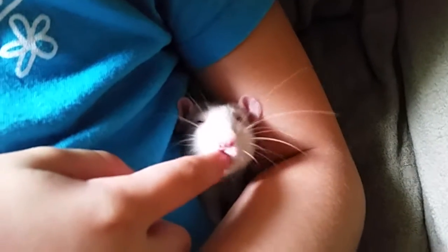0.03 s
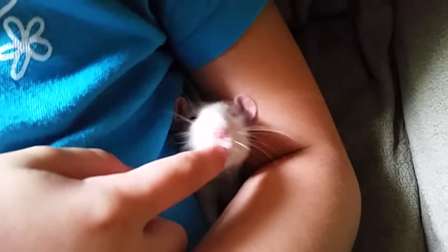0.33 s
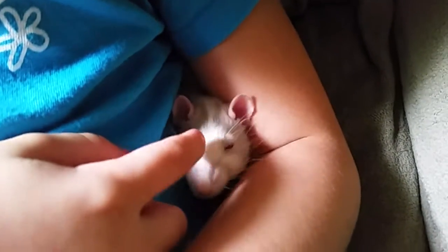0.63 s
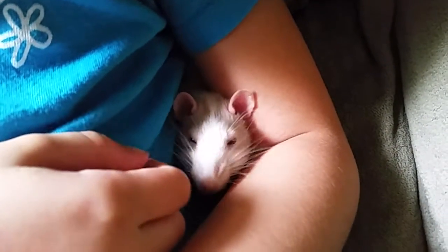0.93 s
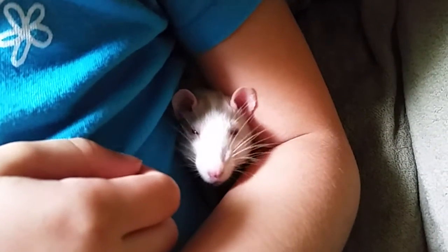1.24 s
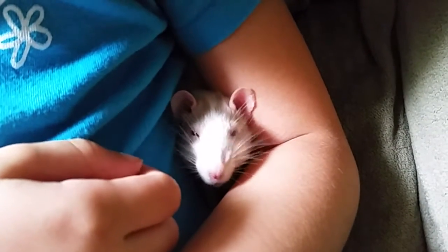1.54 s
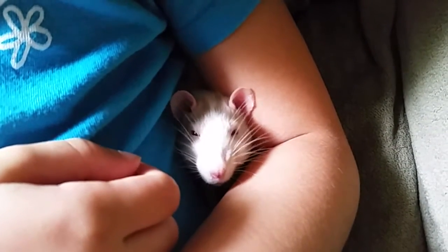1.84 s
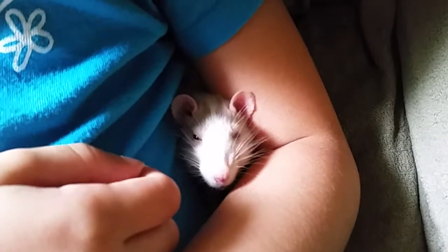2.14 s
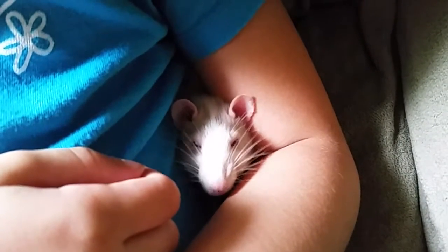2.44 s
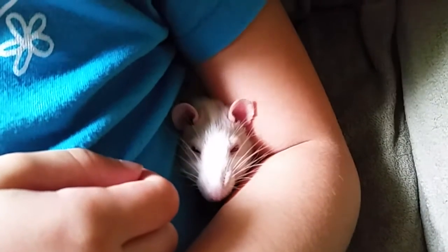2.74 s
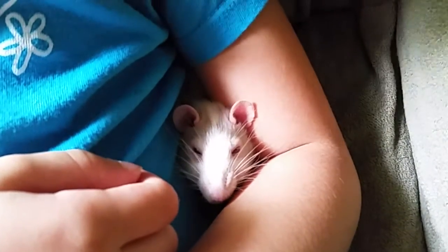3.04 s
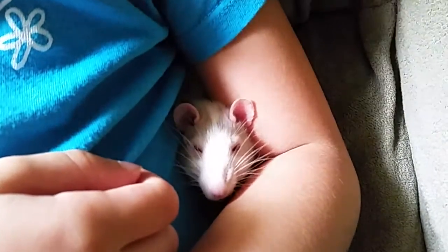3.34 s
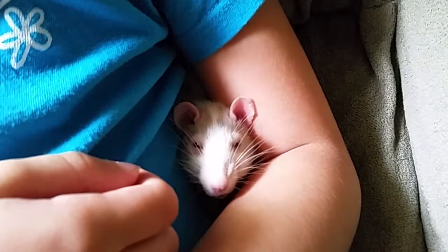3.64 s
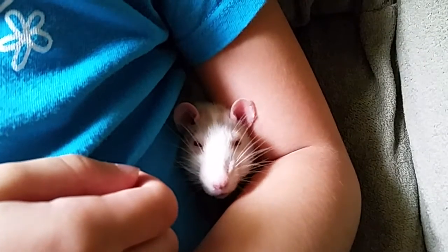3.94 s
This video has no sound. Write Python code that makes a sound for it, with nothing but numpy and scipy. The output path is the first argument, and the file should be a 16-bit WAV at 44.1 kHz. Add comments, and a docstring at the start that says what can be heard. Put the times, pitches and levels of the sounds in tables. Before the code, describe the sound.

A pet rat grinds its teeth in soft, quick clicks close to the microphone, stops, then makes a few thin, high scrapes. Fur and cloth rustle faintly with soft bumps, over a quiet room's steady low hum and hiss.

```python
"""Soft, quick tooth grinding, close to the microphones: a pet rat held in the crook of an arm.
About seven strokes a second, every second one stronger, each a few tiny slips of the incisors
that knock in the skull. Its mouth pops softly; fur and cloth rustle as the arm shifts.
Further off a quiet room rumbles and hums, and two unlike microphones hiss, left and right."""
import sys
import numpy as np
from scipy import signal
from scipy.fft import rfft, irfft, next_fast_len
from scipy.io import wavfile
from scipy.ndimage import map_coordinates

SR = 44100
rng = np.random.default_rng(int(sys.argv[2]) if len(sys.argv) > 2 else 0)


def digitize_waveform(pressure):
    """Quantize a signal to 16-bit integers and store it at the path in sys.argv[1].

    Rows of a 2-D input are taken as channels; values are limited to [-1, 1].
    """
    field = np.atleast_2d(pressure).T
    bounded = np.clip(field, -1, 1)
    quanta = np.round(bounded * 32767).astype(np.int16)
    wavfile.write(sys.argv[1], SR, quanta)


N = 176400


def amp(db):
    """Decibels to gain."""
    return 10 ** (np.asarray(db) / 20)


def unit(x):
    """Scale to rms 1."""
    return x / np.sqrt(np.mean(x ** 2) + 1e-20)


def gains(points, hz):
    """Gain of each dB column, read on a log frequency axis."""
    f, *columns = np.transpose(points)
    return amp([np.interp(np.log(hz + 1), np.log(f + 1), db) for db in columns])


def filtered(x, response):
    """x times a response of frequency."""
    size = next_fast_len(N + SR // 2)
    return irfft(rfft(x, size) * response(np.fft.rfftfreq(size, 1 / SR)), size)[..., :N]


def noise(points, channels=1):
    """Noise with the given density in dB per Hz."""
    white = rng.standard_normal((channels, N)) * np.sqrt(SR / 2)
    return filtered(white, lambda hz: gains(points, hz))


def ring(x, colour, size=2048):
    """x through a causal, minimum-phase filter for each dB column of the colour table."""
    cepstrum = irfft(np.log(gains(colour, np.fft.rfftfreq(size, 1 / SR)) + 1e-6))
    cepstrum[:, 1:size // 2] *= 2
    cepstrum[:, size // 2 + 1:] = 0
    impulse_response = irfft(np.exp(rfft(cepstrum)))
    return signal.fftconvolve(x[None], impulse_response, axes=1)[:, :N]


def wobble(rate):
    """A smooth random curve, rate knots a second."""
    knots = rng.standard_normal(int(N * rate / SR) + 4)
    return map_coordinates(knots, [np.arange(N) * rate / SR])


def swell(start, length):
    """A soft arch from 0 to 1 and back, timed in seconds."""
    return np.sin(np.pi * np.clip((np.arange(N) / SR - start) / length, 0, 1))


def add(track, start, x):
    """Mix x into the track at start seconds."""
    part = track[round(start * SR):][:len(x)]
    part += x[:len(part)]


def tooth_grinding():
    """Close up, each incisor slip is a gritty pulse that snaps, clacks and knocks in the skull."""
    # slips of the teeth; the jaw sets the knock's pitch
    # (t/s, snap level/dB, clack level/dB, knock level/dB, knock f/Hz)
    slips = [(.6051, -51, -47, -70, 1000), (.6118, -38.5, -35, -59, 1000), (.6134, -43, -38.5, -48.5, 950),
             (.7481, -51.5, -56, -58, 1200), (.8751, -50, -45, -60, 1500), (.8764, -49, -45, -54, 1500),
             (.8780, -48, -41, -48, 950), (1.0169, -54, -56, -63, 1400), (1.0189, -52, -49, -58, 1350),
             (1.1590, -37.5, -37, -57, 1400), (1.1608, -40, -36.5, -51, 1400),
             (1.1650, -43, -39, -43, 1250), (1.4348, -53, -47, -58, 1000), (1.4405, -47, -46, -52, 1050),
             (1.4476, -47, -38.5, -43, 1230), (1.4552, -52, -49, -48, 950), (1.5694, -55, -51, -54, 1060),
             (1.5712, -52, -49, -56, 1400), (1.5993, -55, -60, -65, 1200), (1.7053, -46, -46, -60, 1400),
             (1.7122, -37, -38.5, -43, 1080), (1.8650, -57, -50, -55, 1000), (1.8672, -54, -44, -52, 1200),
             (2.0072, -49, -44, -58, 1950), (2.0306, -53, -52, -70, 2000), (2.1495, -56, -48, -64, 1100),
             (2.1677, -36, -33.5, -54, 2100), (2.1690, -44, -42, -51, 1020)]
    # colour of the bright snap at each microphone (f/Hz, left level/dB, right level/dB)
    snap_colour = [(8500, -11, -9), (9600, -3, 1), (10500, 8, 7), (12000, 13, 7), (13400, 12.5, 6),
                   (15000, 7, 4), (16500, -4, -4)]
    # colour of the midrange clack (f/Hz, left level/dB, right level/dB)
    clack_colour = [(590, 2, -6), (1100, 6, 1), (1700, 1, 1), (2200, 5, 4.5), (2860, 1, -4), (3460, 7, 17),
                    (3900, 5, 19), (4600, 11.5, 22), (5600, 0, 19.5), (6420, -8, 5), (8440, -29, -31)]
    # modes of skull and mouth (multiple of the knock pitch, level/dB, t60/s)
    skull_modes = [(1, 4.5, .0085), (1.36, -1.5, .007)]
    grit, grit_t60_s = .36, .0045
    knock_attack_s, knock_detune, knock_left_db = .0005, .02, -2.5
    snap, clack, knock = np.zeros((3, N))
    t = np.arange(SR // 20) / SR
    rise = 1 - np.exp(-t / knock_attack_s)
    for start, snap_db, clack_db, knock_db, knock_hz in slips:
        pulse = grit * rng.standard_normal(len(t)) * amp(-60 * t / grit_t60_s)
        pulse[0] = 1  # the sharp slip itself, ahead of its grit
        pulse /= np.linalg.norm(pulse)
        add(snap, start, amp(snap_db) * pulse)
        add(clack, start, amp(clack_db) * pulse)
        for ratio, db, t60 in skull_modes:
            mode_hz = knock_hz * ratio * rng.normal(1, knock_detune)
            mode = np.sin(2 * np.pi * (mode_hz * t + rng.random()))
            add(knock, start, amp(knock_db + db - 60 * t / t60) * rise * mode)
    return ring(snap, snap_colour) + ring(clack, clack_colour) + knock * amp([[knock_left_db], [0]])


def enamel_rubs():
    """Enamel slides on enamel with a brief, very high whistle, mostly on the left microphone."""
    # rubs of the teeth (t/s, f/Hz, level/dB, t60/s)
    rubs = [(.2672, 14400, -53, .007), (.3415, 12800, -50, .007), (3.0038, 12340, -55.5, .035),
            (3.1372, 13200, -38.5, .01), (3.2088, 15000, -49, .006), (3.2850, 12300, -50, 0.011)]
    width_hz, attack_s, right_db = 1200, .001, -12
    out, t = np.zeros(N), np.arange(SR // 10) / SR
    rise = 1 - np.exp(-t / attack_s)
    for start, centre_hz, db, t60 in rubs:
        friction = rng.standard_normal(N)
        whistle = unit(filtered(friction, lambda hz: 1 / (1 + ((hz - centre_hz) / width_hz) ** 2) ** 2))
        add(out, start, amp(db - 60 * t / t60) * rise * whistle[:len(t)])
    return out * amp([[0], [right_db]])


def mouth_pops():
    """The mouth opens with a soft, slightly rough tock, right of centre."""
    # pops of the mouth (t/s, f/Hz, level/dB)
    pops = [(.3412, 1280, -53), (3.8310, 1310, -47.5)]
    attack_s, t60_s, roughness_rad, left_db = .002, .012, .4, -6
    out, t = np.zeros(N), np.arange(SR // 20) / SR
    envelope = (1 - np.exp(-t / attack_s)) ** 2 * amp(-60 * t / t60_s)
    envelope /= envelope.max()
    for start, hz, db in pops:
        phase = 2 * np.pi * hz * t + roughness_rad * wobble(2 * hz)[:len(t)]
        add(out, start, amp(db) * envelope * np.sin(phase))
    return out * amp([[left_db], [0]])


def fur_rustles():
    """Fur and whiskers brush on skin and cloth: a grainy fizz to the left over a duller brush."""
    # rustles (t/s, length/s, fizz level/dB, brush level/dB)
    rustles = [(-.06, 0.2, -72.5, -63), (1.033, 0.21, -66.5, -71), (1.404, .2, -74, -71.5),
               (2.992, 0.037, -73, -100), (3.067, 0.28, -73, -95), (3.73, 0.045, -73, -83),
               (3.777, .17, -79, -79)]
    # colour of the bright fizz (f/Hz, relative level/dB)
    fizz_colour = [(8500, -33), (10500, -9), (12400, 2.5), (15500, -1.5), (16200, -22)]
    # colour of the dull brush (f/Hz, relative level/dB)
    brush_colour = [(500, -22), (1000, 11.5), (2200, 3.5), (2900, -8), (5000, -19), (7500, -40)]
    grain_db, fizz_right_db = 3, -7
    fizz_envelope = sum(amp(db) * swell(start, length) for start, length, db, _ in rustles)
    brush_envelope = sum(amp(db) * swell(start, length) for start, length, _, db in rustles)
    fizz = unit(noise(fizz_colour, channels=2) * amp(grain_db * wobble(rate=530)))
    brush = unit(noise(brush_colour, channels=2))
    return fizz_envelope * fizz * amp([[0], [fizz_right_db]]) + brush_envelope * brush


def shifting_arm():
    """The arm shifts with soft low bumps and muffled brushes of cloth, alike on both microphones."""
    # bumps of the arm (t/s, length/s, level/dB)
    bumps = [(1.284, 0.14, -44), (2.529, 0.22, -42.5), (3.766, 0.24, -45.5)]
    # colour of a bump (f/Hz, relative level/dB)
    bump_colour = [(20, -4), (60, 4), (130, -4), (200, 0.5), (300, -18.5), (700, -30), (2000, -85)]
    # brushes of cloth (t/s, length/s, level/dB)
    brushes = [(1.45, .16, -60), (2.637, .34, -63.5)]
    # colour of the cloth (f/Hz, relative level/dB)
    cloth_colour = [(200, -15), (400, 13.5), (700, 1), (1300, -15), (3000, -48)]
    bump_envelope = sum(amp(db) * swell(start, length) for start, length, db in bumps)
    cloth_envelope = sum(amp(db) * swell(start, length) for start, length, db in brushes)
    return bump_envelope * unit(noise(bump_colour)) + cloth_envelope * unit(noise(cloth_colour))


def with_room(direct, tail_db=-11, t60_s=.07):
    """At close range the room adds only a short, faint tail to the direct sound."""
    t = np.arange(SR // 4) / SR
    tail = rng.standard_normal((2, len(t))) * amp(-60 * t / t60_s)
    tail /= np.linalg.norm(tail[0])
    return direct + amp(tail_db) * signal.fftconvolve(direct, tail, axes=1)[:, :N]


def appliance_hum():
    """An appliance hums in the background, each tone wavering a little in level and phase."""
    # tones of the hum (f/Hz, level/dB, lean/dB added on the left and taken off the right)
    tones = [(57.57, -56, 1), (118.53, -55, 2), (175.7, -63, -0.5), (229.4, -65, 2.5), (268.6, -55, -1),
             (290.5, -77.5, -3.5)]
    waver_db, drift_rad = -0.1, 0.18
    out, t = np.zeros((2, N)), np.arange(N) / SR
    for hz, db, lean_db in tones:
        rms = amp(db + waver_db * wobble(rate=3.5) + np.array([[lean_db], [-lean_db]]))
        phase = 2 * np.pi * (hz * t + rng.random()) + drift_rad * wobble(rate=3.78)
        out += np.sqrt(2) * rms * np.sin(phase)
    return out


def room_rumble():
    """Low room tone, nearly the same at both microphones."""
    # mid: rumble common to both sides (f/Hz, level/dB per Hz)
    mid = [(10, -82), (20, -65), (50, -68), (70, -73), (98, -65), (140, -77), (180, -74.5), (235, -77),
           (300, -81), (400, -87.5), (600, -99.5), (1000, -103), (2500, -120), (6000, -150)]
    # side: rumble in opposite polarity left and right (f/Hz, level/dB per Hz)
    side = [(20, -92), (100, -85), (250, -88), (400, -94.5), (700, -106), (3000, -140)]
    return noise(mid) + noise(side) * [[1], [-1]]


def microphone_hiss():
    """Each microphone hisses in its own colour; the hiss swells once, briefly."""
    # noise floor of the pair (f/Hz, left level/dB per Hz, right level/dB per Hz)
    floor = [(190, -100, -100), (590, -90.5, -89.5), (744, -101, -93), (1150, -103, -96.5),
             (1570, -109, -106.5), (2400, -112.5, -107), (2890, -114.5, -111), (3280, -112, -98.5),
             (3630, -115, -104.5), (4060, -111, -91.5), (4350, -110, -89), (4830, -115, -93.5),
             (5780, -119, -99), (6600, -128, -115), (7050, -133, -133), (8800, -133, -134),
             (10230, -125, -125), (11200, -116, -117), (12220, -110.5, -113), (13000, -106.5, -111),
             (13900, -113, -114), (15700, -113, -113), (16400, -135, -135)]
    lift_db = 1.6 * swell(start=2.43, length=0.56)
    return noise(floor, channels=2) * amp(lift_db)


def scene():
    """The rat on the arm close to the microphone pair, the quiet room behind."""
    rat = with_room(tooth_grinding() + mouth_pops() + enamel_rubs())
    return rat + fur_rustles() + shifting_arm() + appliance_hum() + microphone_hiss() + room_rumble()


def record(dry, top_hz=16200):
    """The recorder keeps nothing above its band limit."""
    return filtered(dry, lambda hz: hz < top_hz)


dry = scene()
out = record(dry)
digitize_waveform(out)
```